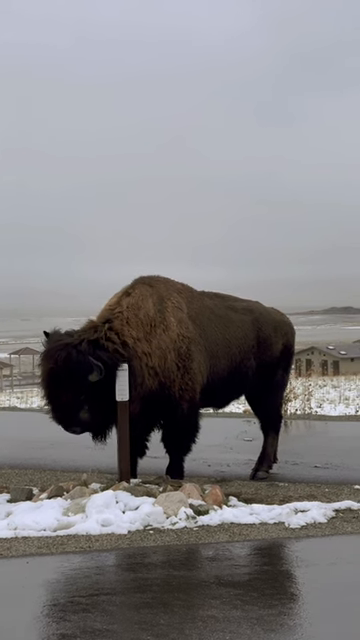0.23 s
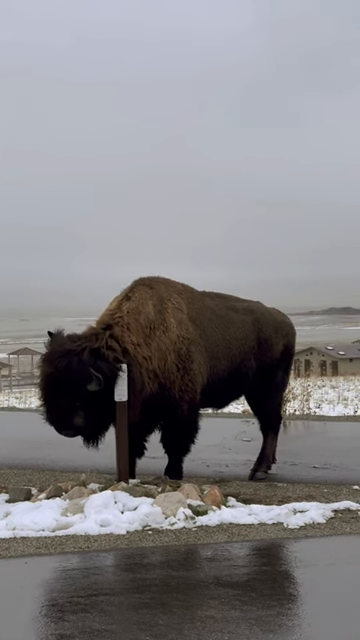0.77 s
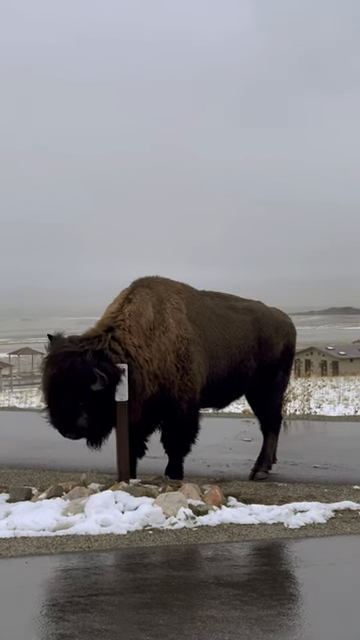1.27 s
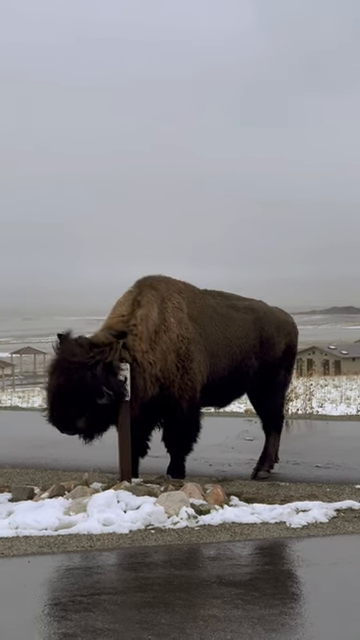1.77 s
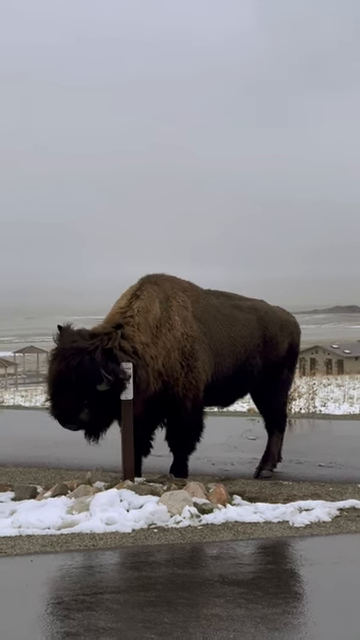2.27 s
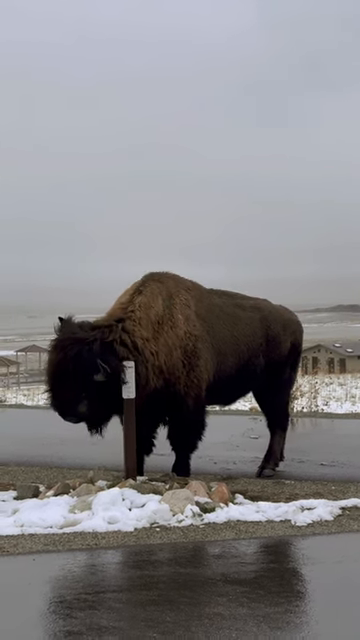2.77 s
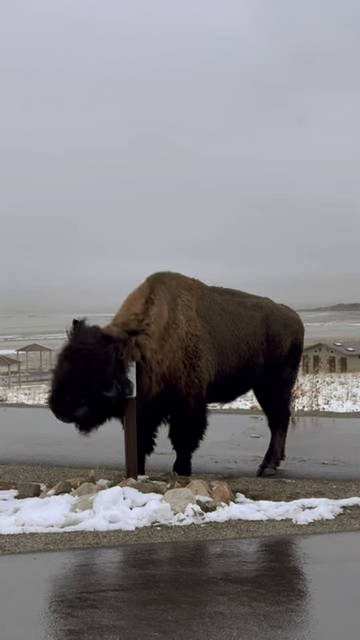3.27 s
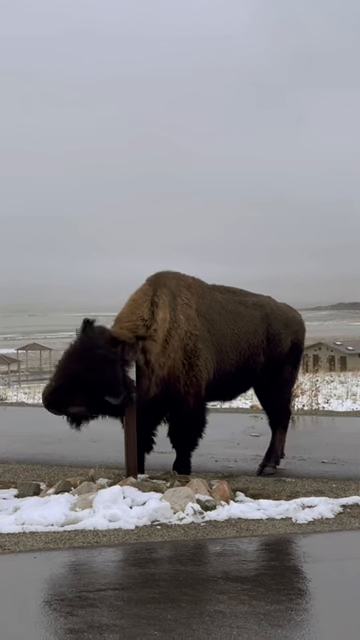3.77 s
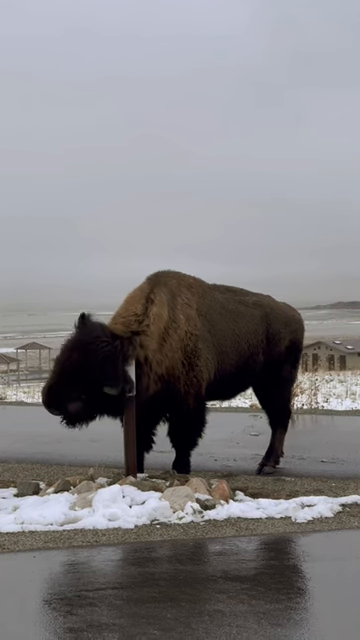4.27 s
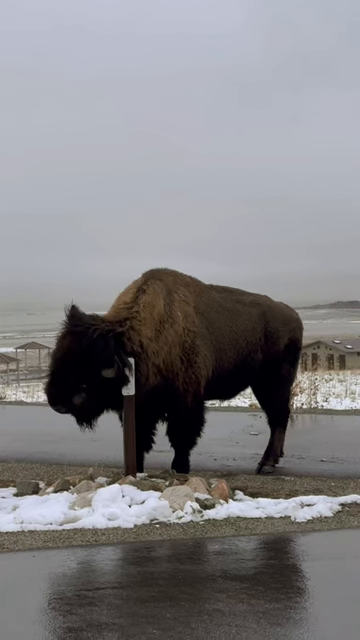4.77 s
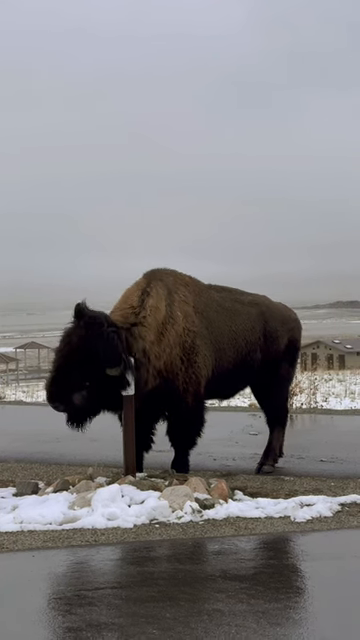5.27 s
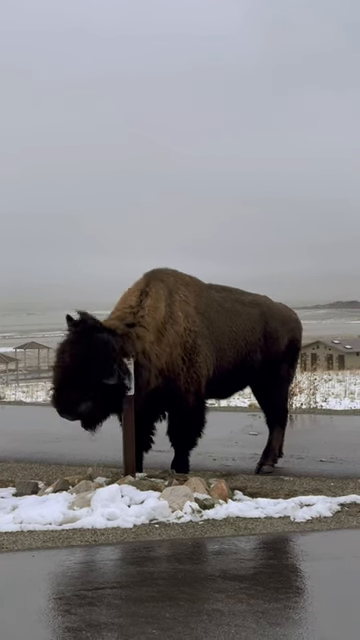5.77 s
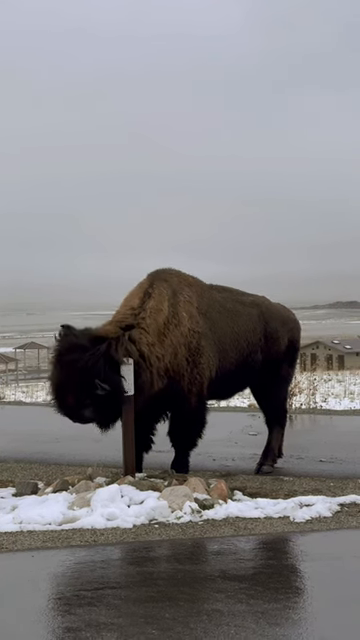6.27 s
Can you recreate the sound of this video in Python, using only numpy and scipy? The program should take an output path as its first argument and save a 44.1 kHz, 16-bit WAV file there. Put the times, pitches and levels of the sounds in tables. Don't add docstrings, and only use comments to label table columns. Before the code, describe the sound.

Inside a parked car, a low engine idle throbs steadily, then rises to a slightly faster, stronger rumble with small clicks and cloth rustle.

```python
import sys
import numpy as np
from scipy import signal
from scipy.fft import rfft, irfft, next_fast_len
from scipy.io import wavfile

SR = 44100
rng = np.random.default_rng(int(sys.argv[2]) if len(sys.argv) > 2 else 0)


def makeup_ratio(level_db):
    decades = np.asarray(level_db, float) / 20
    return 10 ** decades


def wav_out(sig):
    wavfile.write(sys.argv[1], SR, np.round(np.clip(np.atleast_2d(sig).T, -1, 1) * 32767).astype(np.int16))


N = 287973


def rms_one(x):
    return x / np.sqrt(np.mean(x ** 2) + 1e-20)


def on_grid(points):
    size = next_fast_len(N + SR // 2)
    hz = np.maximum(np.arange(size // 2 + 1) * SR / size, 1)
    curve_hz, values = np.transpose(points)
    return np.interp(np.log(hz), np.log(curve_hz), values)


def filtered(x, gain):
    size = next_fast_len(N + SR // 2)
    return irfft(rfft(x, size) * gain, size)[:N]


def shaped(x, points):
    return filtered(x, makeup_ratio(on_grid(points)))


def noise(points):
    closed = [(points[0][0] / 2, -80), *points, (points[-1][0] * 2, -120)]
    return rms_one(shaped(rng.standard_normal(N), closed))


def drift(rate_hz):
    low_pass = signal.butter(2, rate_hz, fs=SR / 50, output="sos")
    slow = signal.sosfilt(low_pass, rng.standard_normal(N // 50 + 2002))
    settled = rms_one(slow[2000:])
    return np.interp(np.arange(N) / 50, np.arange(N // 50 + 2), settled)


def resonance(x, hz, width_hz):
    r = np.exp(-np.pi * width_hz / SR)
    return rms_one(signal.lfilter([1, 0, -1], [1, -2 * r * np.cos(2 * np.pi * hz / SR), r * r], x))


def engine_speed():
    # (time [s], rate [Hz])
    firing = [(0, 21.74), (0.6, 21.64), (1.2, 21.86), (1.8, 21.65), (2.3, 21.53), (2.6, 21.8), (2.9, 22.58),
              (3.2, 23.04), (3.5, 23.03), (3.8, 23.29), (4.1, 23.68), (4.4, 24.46), (4.7, 24.84),
              (5, 25.01), (5.4, 25.01), (5.8, 25.26), (6.2, 25.05), (6.53, 25.17)]
    time_s, rate_hz = np.transpose(firing)
    return np.interp(np.arange(N) / SR, time_s, rate_hz)


def revs_of(rate_hz):
    speeds_hz = [22.2, 24.9]
    return np.clip((rate_hz - speeds_hz[0]) / (speeds_hz[-1] - speeds_hz[0]), 0, 1)


def firing_gate(turns, sharp, spread_db):
    chance = np.clip(rng.standard_normal(int(turns[-1]) + 2), -1.5, 1.5)
    strength = makeup_ratio(spread_db * chance)
    bump = (np.sin(np.pi * turns) ** 2) ** np.clip(sharp, .2, 40)
    return strength[turns.astype(int)] * bump


def exhaust(rate_hz, turns):
    # (multiple of firing rate, level at low idle [dB], level at raised idle [dB])
    orders = [(1, -65, -51.5), (2, -55.5, -59), (2.5, -66, -68), (3, -53, -49), (4, -50, -52),
              (4.5, -69, -65), (5, -50.5, -49), (6, -58, -58), (7, -63, -56), (7.5, -66, -59),
              (8, -64, -63), (9, -74, -69), (10, -74, -70), (10.5, -70, -70), (11.75, -82, -74),
              (12, -71, -70), (12.25, -84, -64), (12.5, -68, -76), (13, -74, -77), (13.25, -69, -82),
              (13.5, -69, -80), (14, -69, -67), (16, -68, -75), (18, -76, -73), (24, -75, -82)]
    # (frequency [Hz], half width [Hz], gain [dB])
    cabin = [(45.6, .8, -6), (48, 1.6, 10), (75, 2.5, 8), (96, 2, -6), (108.5, 2.8, 5.5), (137, 3, -7),
             (158, 3, 2.5), (297, 9, 10), (350, 8, 4), (378, 14, 4)]
    crank_turn, shape_turn = .366, .17
    out, revs = np.zeros(N), revs_of(rate_hz)
    for order, low_db, high_db in orders:
        near = [mode for mode in cabin if 20 < mode[0] / order < 27]
        cabin_db = sum(db * np.exp(-((order * rate_hz - hz) / width_hz) ** 2) for hz, width_hz, db in near)
        level = makeup_ratio(low_db + revs * (high_db - low_db) + cabin_db + .7 * drift(3.0))
        angle = order * (turns + crank_turn) + shape_turn + .015 * drift(2.5)
        angle -= .35 * max(order - 5, 0)
        angle += (5 < order < 9) * .35 * (1 - revs)
        angle -= (order == 2) * .25 * (1 + np.tanh(2 * rate_hz - 46.8))
        out += np.sqrt(2) * level * np.cos(2 * np.pi * angle)
    return out


def fan(rate_hz):
    rest_hz, lag_s, start_turn = 68.613, .1, -.4745
    gain, sag = 1.23, .0659
    level_db, swell_db, swell_power = -49.5, 6.5, 4.0
    keep = np.exp(-1 / (lag_s * SR))
    extra = signal.lfilter([1 - keep], [1, -keep], rate_hz - rate_hz[0])
    hum_hz = rest_hz + gain * extra - sag * extra ** 2
    turns = np.cumsum(hum_hz) / SR + start_turn
    hum_db = level_db + swell_db * revs_of(rate_hz) ** swell_power + .5 * drift(2.5)
    return np.sqrt(2) * makeup_ratio(hum_db) * np.cos(2 * np.pi * turns)


def body(turns, load):
    # (frequency [Hz], width [Hz], level [dB])
    panels = [(301, 32, -59.5), (339.2, 20, -70), (516, 27.3, -70.5), (877, 43, -77.5), (999, 22, -80),
              (1310, 38, -75.5), (1476, 45, -76), (1901, 240, -76), (2424, 90, -83), (3270, 270, -96)]
    shake = rng.standard_normal(N) * (0.54 + firing_gate(turns + 0.29, sharp=1.5, spread_db=2.5))
    out = np.zeros(N)
    for hz, width_hz, db in panels:
        ring = resonance(shake, hz, width_hz)
        out += makeup_ratio(db) * resonance(ring, hz, width_hz)
    return load * out


def valves(rate_hz, turns, load):
    cylinder_db = [
        [-7, -5, -9, 0],
        [-5, 0, -8, 0],
    ]
    # (frequency [Hz], width [Hz], level [dB])
    valve_modes = [(9310, 700, -86.5), (8110, 800, -93), (7070, 800, -96.5), (1870, 590, -78.5),
                   (12100, 2500, -102)]
    revs = revs_of(rate_hz)
    cycle = turns + .28 + 3.5 + .15 * revs
    out = np.zeros(N)
    for k, (hz, width_hz, db) in enumerate(valve_modes):
        cylinder = (cycle.astype(int) + k % 2) % 4
        low, high = np.array(cylinder_db)[:, cylinder]
        gate = makeup_ratio(low + revs * (high - low)) * firing_gate(cycle, sharp=1.6, spread_db=2.0)
        hiss = resonance(gate * rng.standard_normal(N), hz, width_hz)
        out += makeup_ratio(db) * resonance(hiss, hz, width_hz)
    return load * out


def roar(rate_hz, turns, clatter_db):
    # (frequency [Hz], density [dB per Hz])
    rumble = [(18, -21.5), (30, -16), (45, -1.5), (70, -3.5), (110, -1), (160, -3.5), (200, -7.5),
              (230, -8), (300, -8), (380, -15), (460, -22.5), (600, -45)]
    # (frequency [Hz], density [dB per Hz])
    clatter = [(300, -32), (420, -6.5), (900, -7), (1150, -10), (1920, -10.5), (2210, -18.5), (2460, -15.5),
               (3720, -22.5), (4300, -31.5), (5300, -36.5), (9100, -33), (10900, -41.5), (11600, -48),
               (13500, -52.5)]
    since = np.arange(N) / SR - 3.66
    span_s, peak_db = .6, 3.5
    shudder_db = peak_db * np.clip(since / .05, 0, 1) * np.exp(-(since / span_s) ** 2)
    rumble_db = -53.5 + 2.5 * revs_of(rate_hz) + shudder_db
    throb_db = .8 * np.cos(2 * np.pi * (turns + .3))
    pumping = makeup_ratio(throb_db + 1.05 * drift(20) + .5 * drift(1.3))
    clatter_level = makeup_ratio(clatter_db - 1.27) * pumping
    direct = makeup_ratio(rumble_db) * noise(rumble) + clatter_level * noise(clatter)
    diffuse = makeup_ratio(rumble_db) * noise(rumble) + clatter_level * noise(clatter)
    return direct, diffuse


def clicks():
    # (time [s], peak [dB], ring [Hz], time to fall 60 dB [s], crack [dB])
    knocks = [(.4294, -59, 3530, 0.012, -10.5), (1.966, -65, 4000, .007, -4), (3.4176, -47, 3700, .004, -6),
              (3.418, -55, 4200, .005, -8), (3.69, -48, 190, .2, -50), (3.607, -46, 88, 0.3, -60),
              (3.694, -54, 1400, 0.039, -12), (3.692, -61.5, 5700, .025, -7),
              (3.614, -52, 1870, 0.026, -13.5), (3.689, -59, 5400, 0.038, -7.5),
              (3.784, -50.5, 2000, 0.016, -13), (3.82, -60.5, 3270, 0.024, -11),
              (3.834, -66, 7700, 0.024, -9), (4.124, -54, 1890, 0.023, -12),
              (4.937, -53.5, 3210, 0.0093, -10)]
    out, t = np.zeros(N), np.arange(SR // 4) / SR
    for s, db, hz, t60, crack_db in knocks:
        crack = makeup_ratio(crack_db) * rng.standard_normal(len(t)) * makeup_ratio(-60 * t / 0.0069)
        rise = np.minimum(t * hz / 2, 1)
        ring = np.sin(2 * np.pi * hz * t) * makeup_ratio(-60 * t / max(t60, .002)) * rise
        out[round(s * SR):][:len(t)] += makeup_ratio(db) * (crack + ring)
    return out


def rustle():
    # (start of peak [s], hold [s], level [dB], fade per 20 dB on either side [s])
    strokes = [(2.75, .005, -80, .07), (3.09, .02, -78.5, .06), (3.425, .03, -77, .06),
               (3.7, .01, -75, .04), (3.77, .07, -74, .05), (4.13, .005, -81, .045), (4.28, .03, -89, .15),
               (4.63, .08, -77.5, .04), (4.95, .02, -86, .2), (5.47, .09, -77.5, .12), (6.4, .06, -80, .08)]
    # (frequency [Hz], density [dB per Hz])
    cloth = [(1200, -13), (3000, -1), (4300, 3.5), (5200, 0), (6000, -1.5), (8000, 2), (9600, 1.5),
             (10700, -12), (14000, -18)]
    t = np.arange(N) / SR
    effort = makeup_ratio(-95) * np.clip((t - 3.3) / .2, 0, 1)
    for s, hold_s, db, fade_s in strokes:
        away_s = np.maximum(np.maximum(s - t, t - s - hold_s), 0)
        effort = effort + makeup_ratio(db - 20 * away_s / fade_s)
    return effort * makeup_ratio(2.5 * drift(86)) * noise(cloth)


def phase_stereo(direct, diffuse):
    # (frequency [Hz], lead [half turns])
    left_lead = [(250, .002), (620, .09), (1000, .14), (1750, 0), (6250, 0), (6700, -.15), (10300, -.62),
                 (11050, -1)]
    # (frequency [Hz], mid sent to side [dB])
    left_bias = [(240, -60), (400, -27), (620, -23), (1000, -34), (1600, -59)]
    # (frequency [Hz], side minus mid [dB])
    width = [(60, -40), (96, -36.5), (150, -27), (240, -16.5), (390, -10), (620, -5.5), (990, -10.5),
             (1500, -13), (1800, -59)]
    hz = np.fft.rfftfreq(next_fast_len(N + SR // 2), 1 / SR)
    flip = 1 + np.tanh((hz - 4950) / 190)
    half_lead = (on_grid(left_lead) - flip) * np.pi / 2
    mid = filtered(direct, np.cos(half_lead))
    side = filtered(direct, 1j * np.sin(half_lead))
    side = side + shaped(direct, left_bias) + shaped(diffuse, width)
    return np.array([mid + side, mid - side])


def scene():
    rate_hz = engine_speed()
    turns = np.cumsum(rate_hz) / SR
    clatter_db = -62.8 + 2.3 * revs_of(rate_hz)
    load = makeup_ratio(clatter_db + 60)
    direct, diffuse = roar(rate_hz, turns, clatter_db)
    engine = exhaust(rate_hz, turns) + body(turns, load) + valves(rate_hz, turns, load)
    nearby = clicks() + rustle()
    return phase_stereo(direct + engine + fan(rate_hz) + nearby, diffuse)


def band_limit(x):
    return signal.sosfilt(signal.butter(12, 13700, fs=SR, output="sos"), x)


def record(dry):
    return band_limit(dry)


dry = scene()
out = record(dry)
wav_out(out)
```